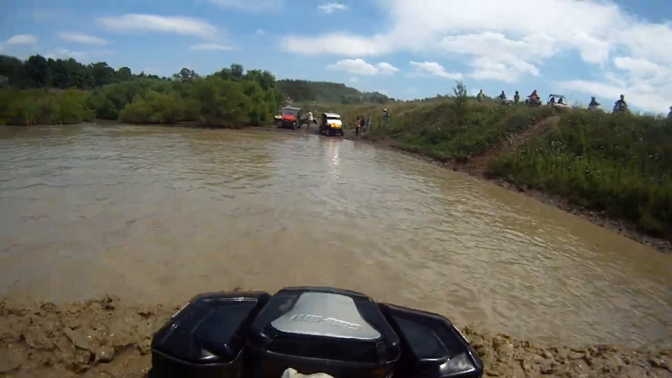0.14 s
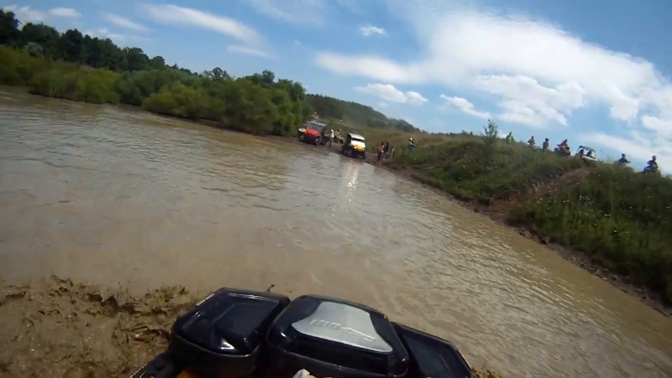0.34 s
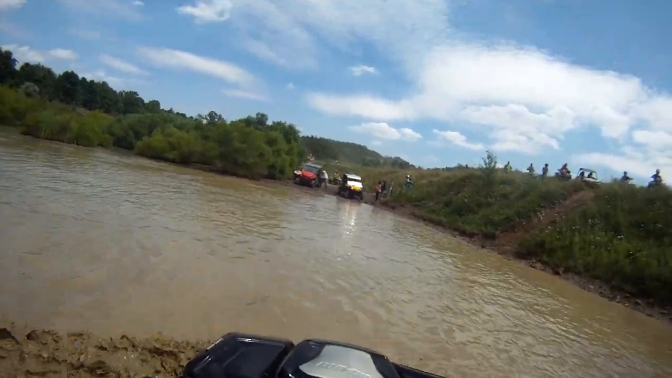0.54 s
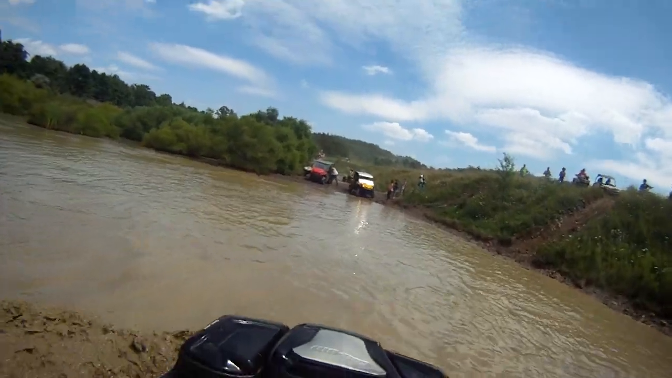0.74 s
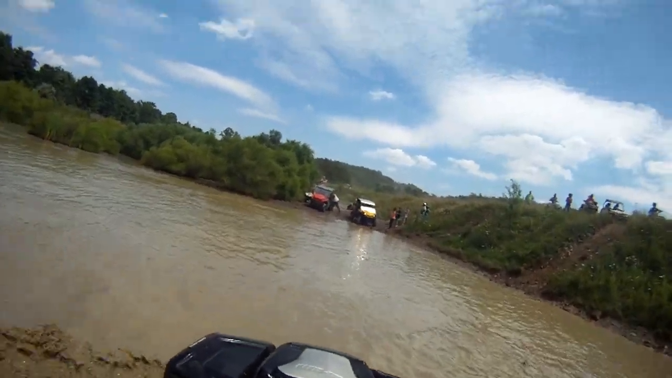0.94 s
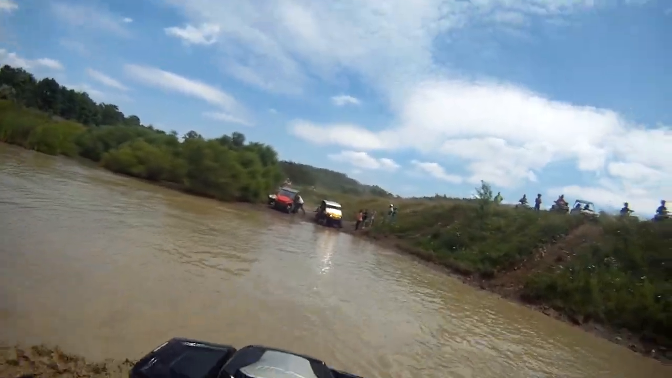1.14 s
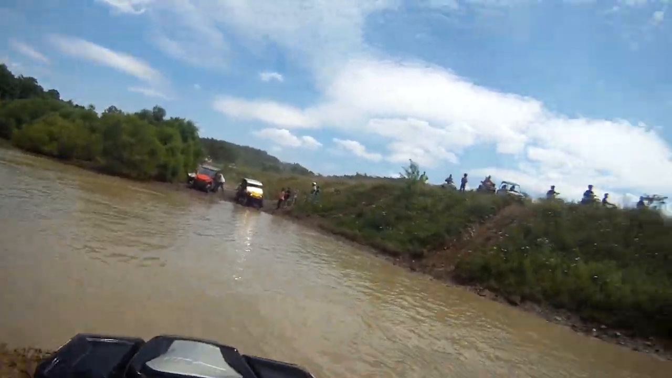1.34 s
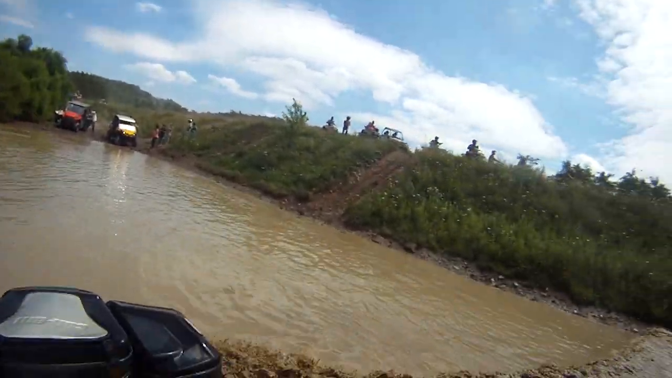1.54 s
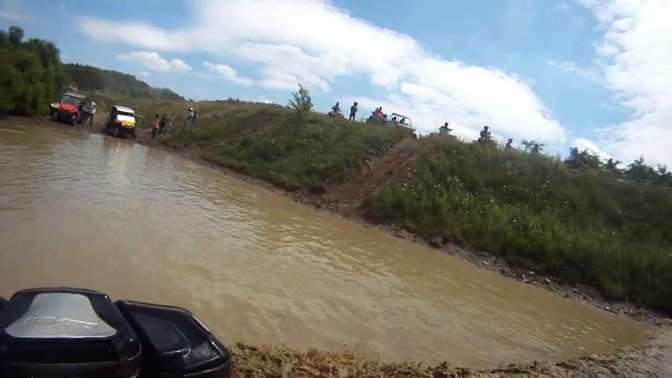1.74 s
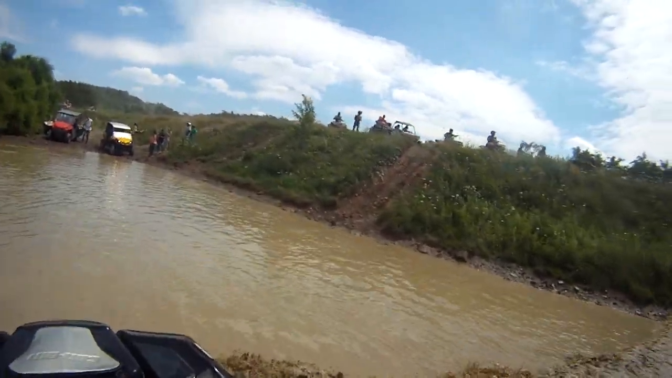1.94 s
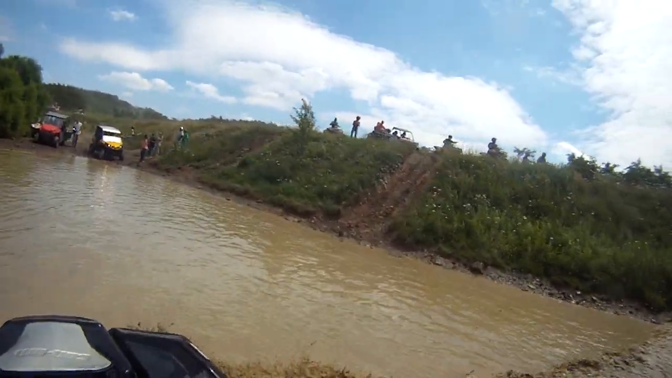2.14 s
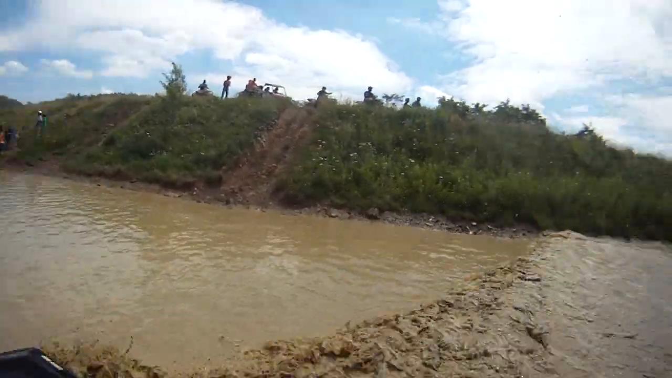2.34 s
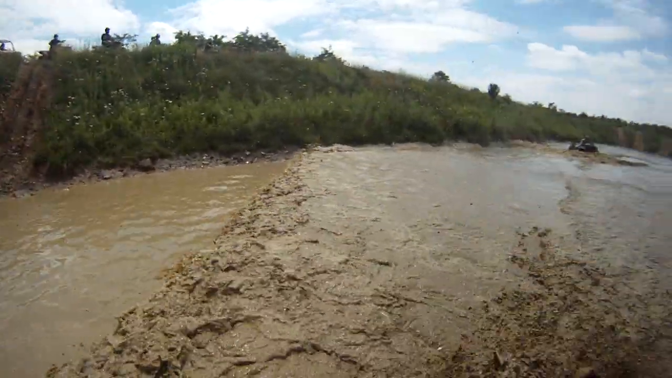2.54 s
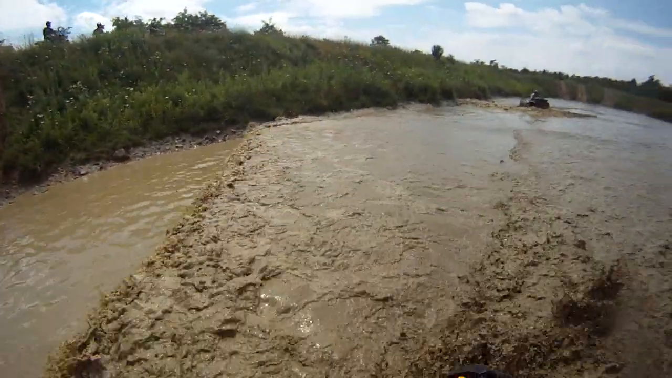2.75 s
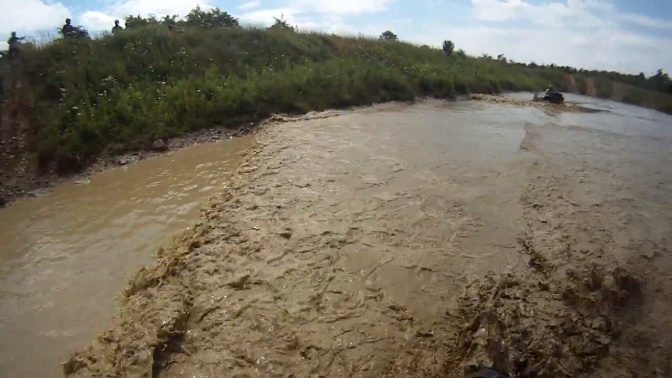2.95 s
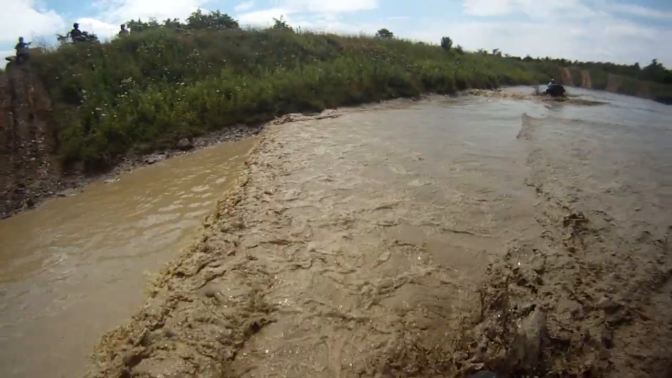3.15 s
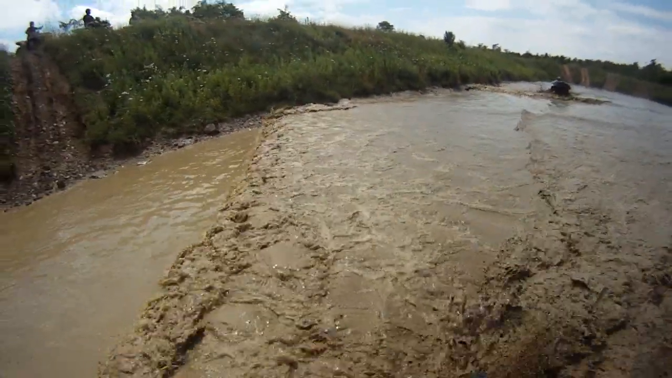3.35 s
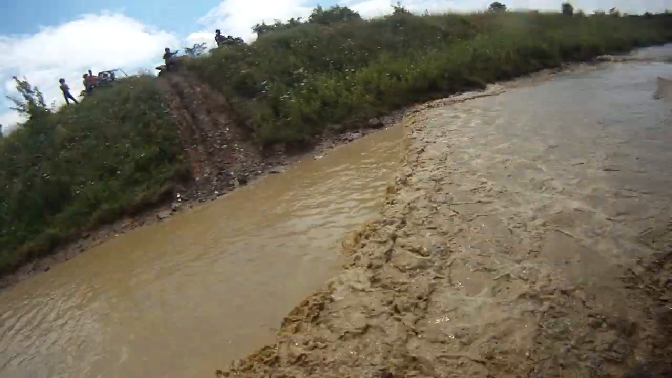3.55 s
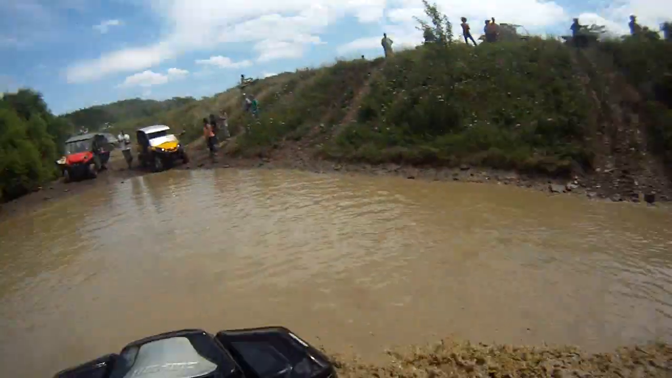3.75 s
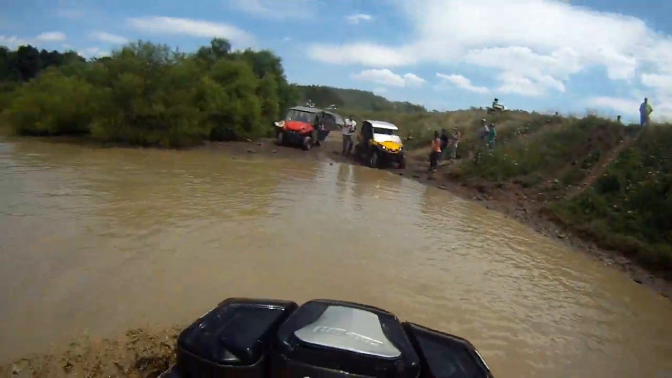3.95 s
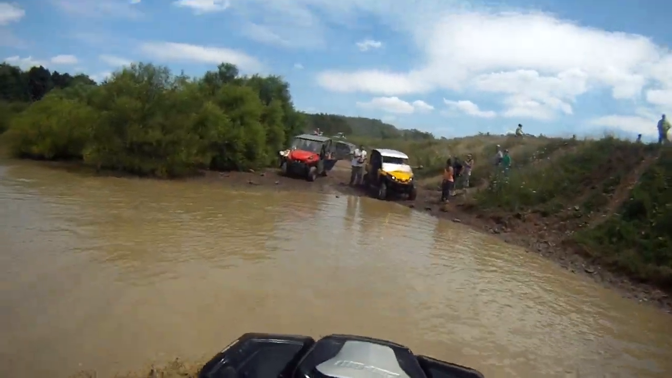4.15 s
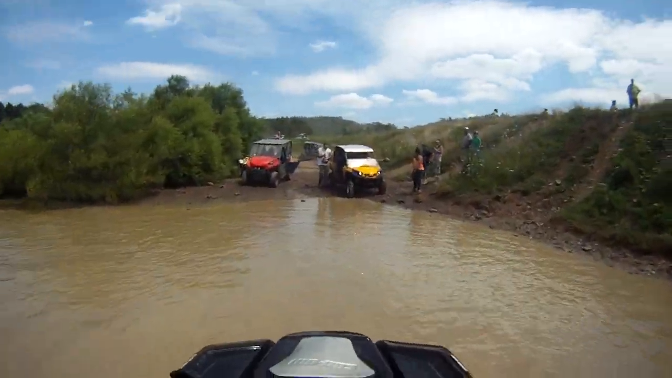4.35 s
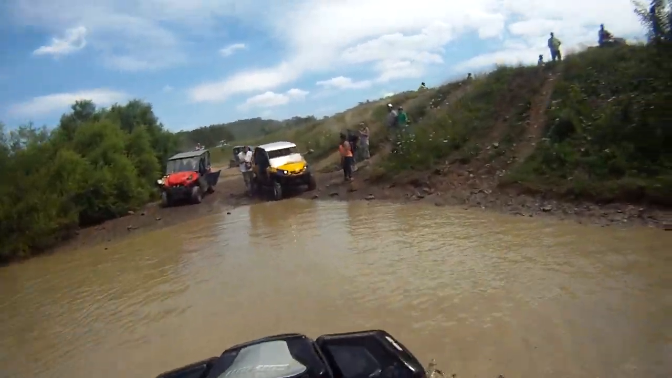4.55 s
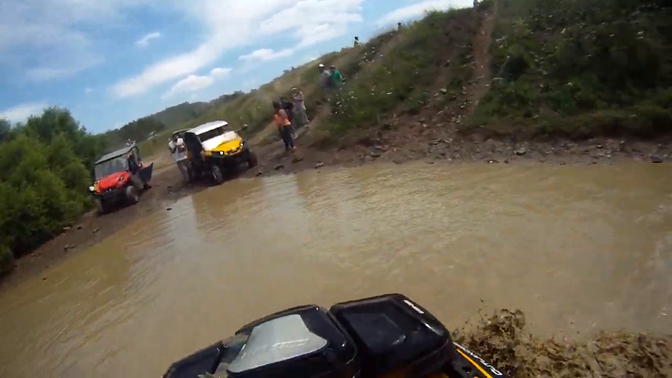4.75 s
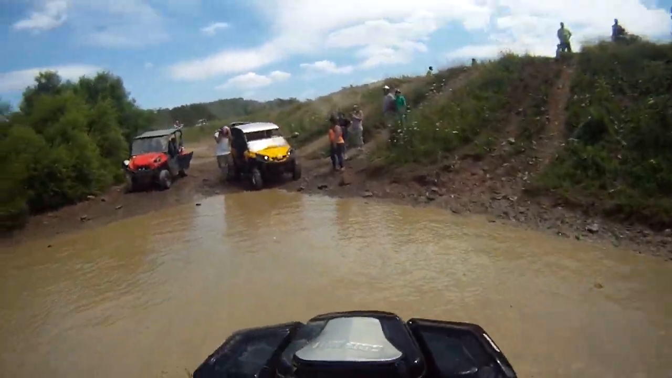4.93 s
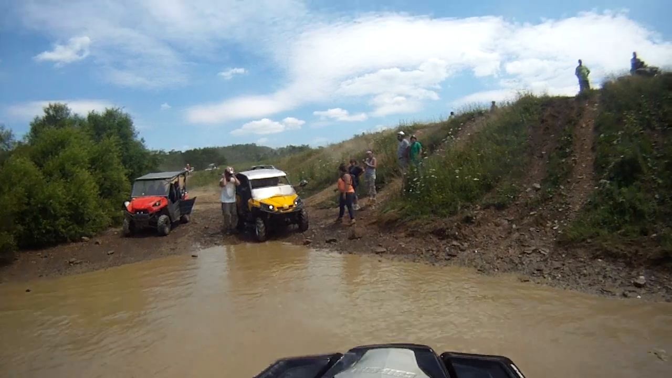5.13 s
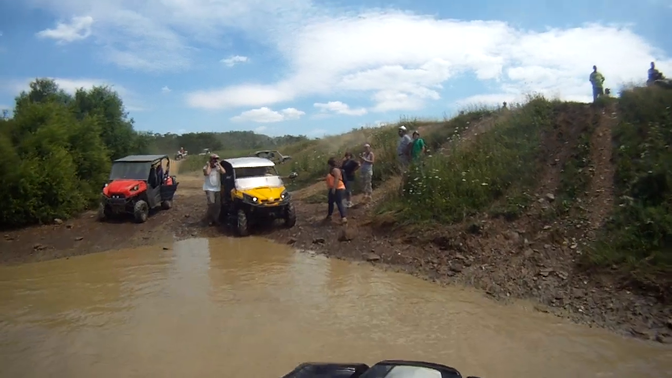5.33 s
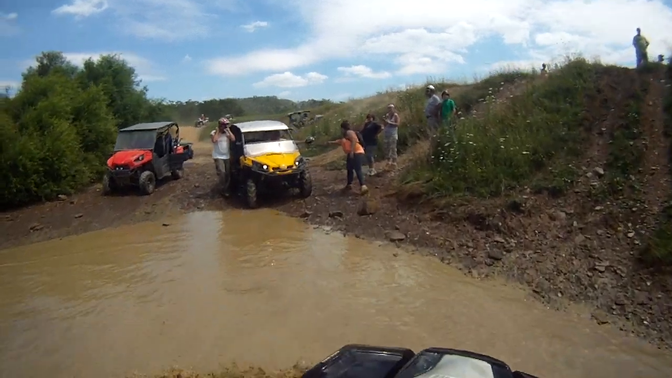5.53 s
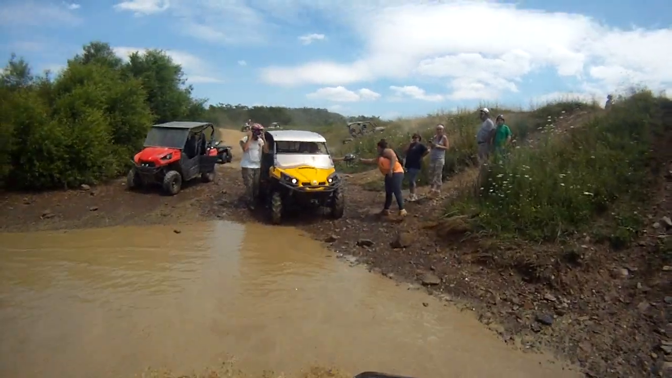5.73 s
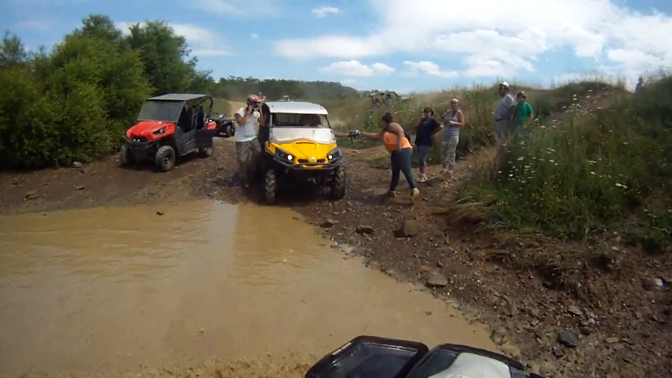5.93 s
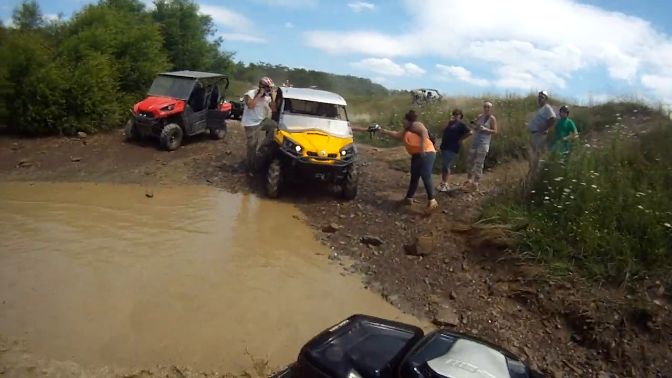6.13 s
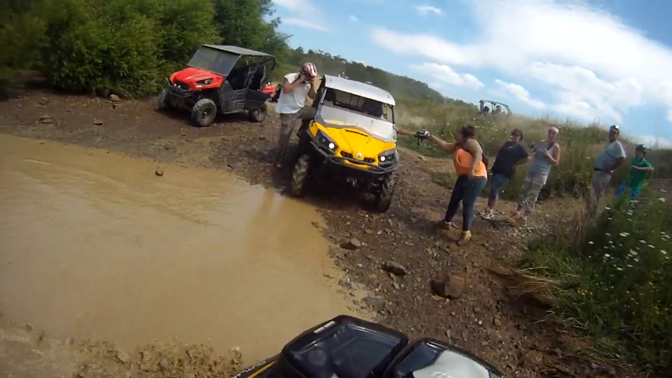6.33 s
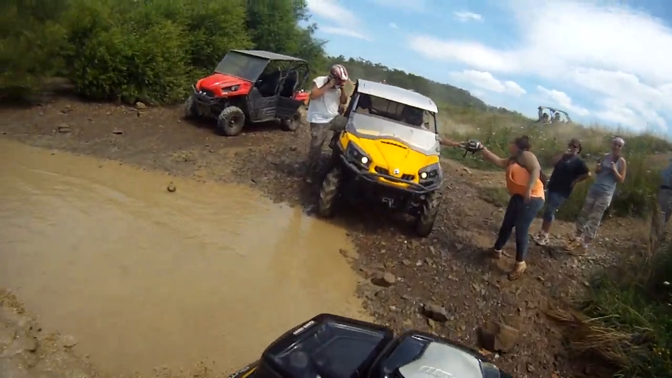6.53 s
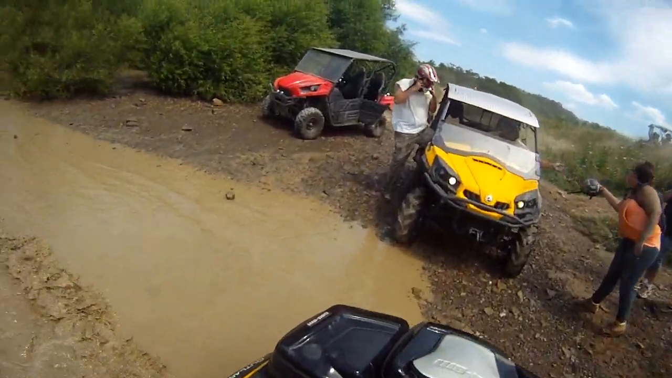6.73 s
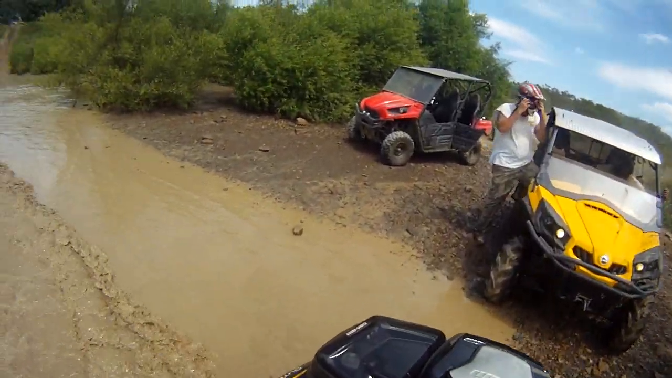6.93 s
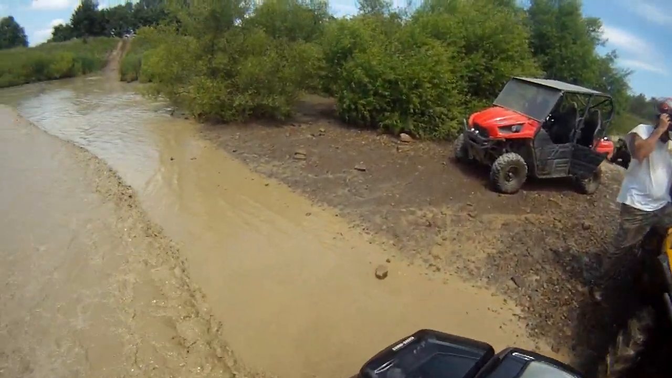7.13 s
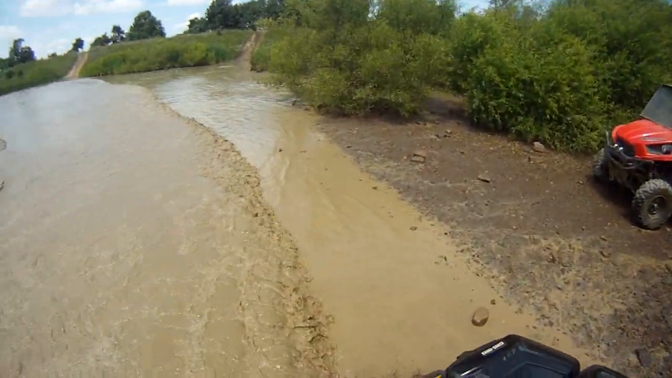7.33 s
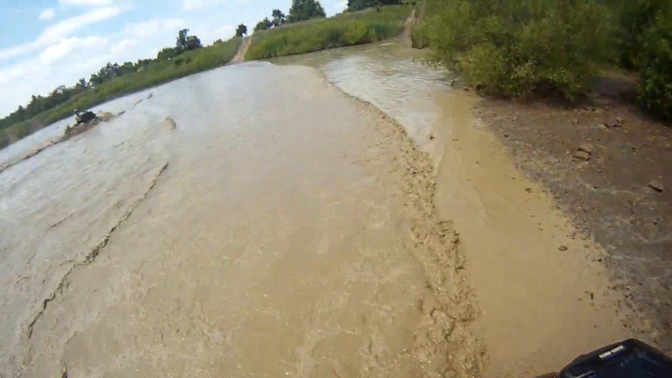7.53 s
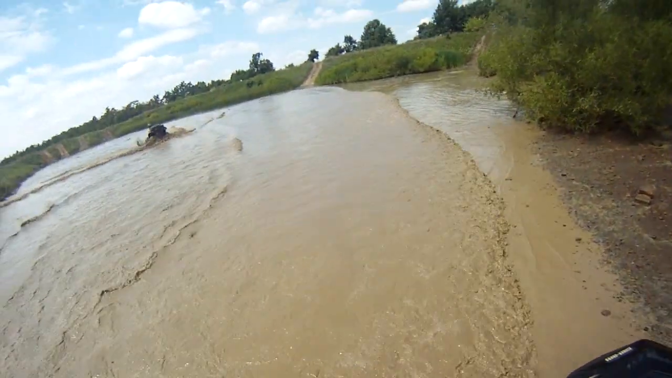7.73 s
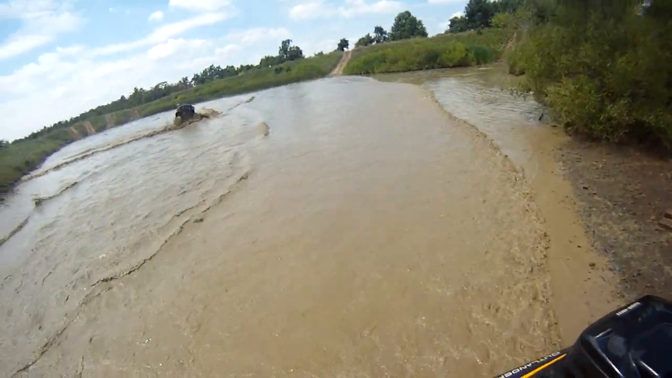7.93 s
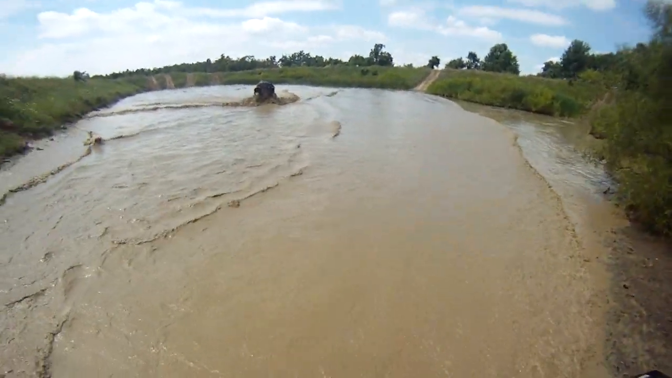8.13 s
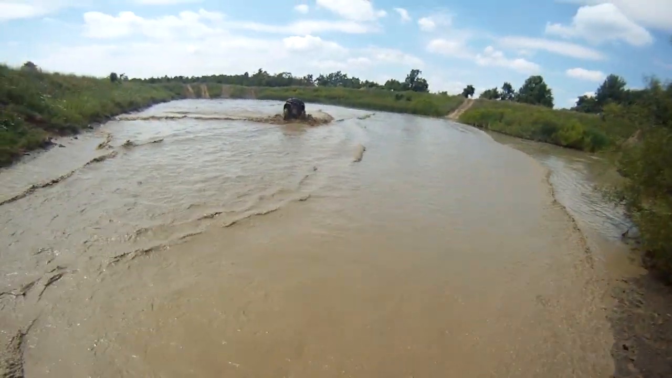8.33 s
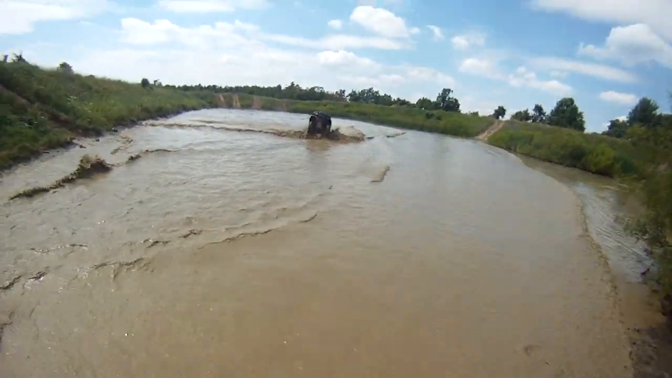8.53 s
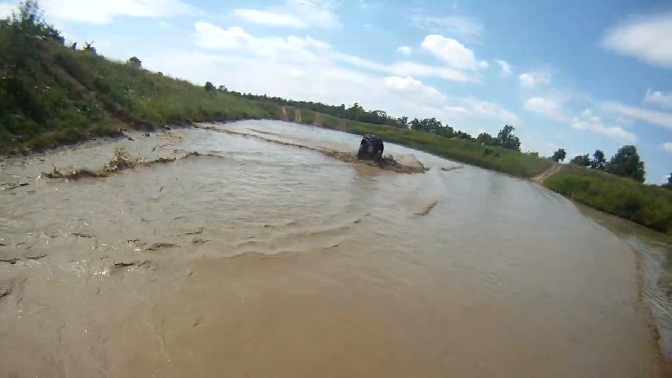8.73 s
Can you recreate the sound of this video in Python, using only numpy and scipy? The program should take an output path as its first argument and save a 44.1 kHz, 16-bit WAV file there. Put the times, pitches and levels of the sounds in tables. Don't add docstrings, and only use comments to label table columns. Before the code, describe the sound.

Gritty, lo-fi onboard sound of an all-terrain vehicle booming through deep muddy water, slowing near the bank with brief throttle blips.

```python
import sys
import numpy as np
from scipy import signal
from scipy.fft import rfft, irfft
from scipy.io import wavfile
from scipy.ndimage import uniform_filter1d, map_coordinates

SR = 44100
rng = np.random.default_rng(int(sys.argv[2]) if len(sys.argv) > 2 else 0)


def generate_wav(signal):
    frames = np.transpose(np.atleast_2d(signal))
    scaled = np.clip(frames, -1, 1) * 32767
    pcm = np.round(scaled).astype(np.int16)
    wavfile.write(sys.argv[1], SR, pcm)


def ratio(d):
    e = np.asarray(d, float) / 20
    return 10 ** e


N = 387189
SECOND_FIRING = .4

# [t/s, f/Hz]
SPEED = [(0, 45.3), (.6, 45.8), (1.7, 47.2), (3.4, 47), (4.6, 46.3), (5.01, 44.8), (5.26, 41.6),
         (5.62, 28.3), (6.21, 27.9), (6.5, 29.3), (7.14, 25.5), (7.43, 19.5), (7.6, 18.4), (7.85, 23.6),
         (8.17, 24.9), (8.44, 27.5), (8.56, 27.5), (8.78, 20.9)]
# [t/s, change of the cycle f/Hz, half length/s]
SPEED_CHANGES = [(0.57, 1.2, 0.11), (0.69, -0.4, 0.03), (0.91, 2.1, 0.09), (1.08, -2.7, 0.22), (1.95, 2.8, 0.12),
                 (2.31, -1.6, 0.35), (3.65, 2.8, 0.1), (3.97, -2.4, 0.08), (4.2, -0.6, 0.17), (4.34, 1.8, 0.06),
                 (4.73, -0.8, 0.16),
                 (5.47, -1, .1),
    (5.85, .6, .2),
    (6.78, -.4, .15),
    (7.7, -.6, .06),
    (8.29, .6, .08),
]


def crank():
    speed_changes = [(s, half_s, change) for s, change, half_s in SPEED_CHANGES]
    hz = curves(SPEED)[0] + bells(speed_changes)
    uneven = 1 + .002 * wobble(20)
    turn = 2 * np.pi * np.cumsum(hz * uneven) / SR
    load = np.clip((hz - 30) / 12, 0, 1)
    return turn, load


# [multiple of the cycle, level/dB at full load, level/dB at light load, unsteadiness/dB]
STRONG_ORDERS = [(1, -43, -59, -0.5), (2, -31, -42, 0.15), (3, -34.5, -40.5, 0.55), (4, -51, -47.5, 2.5),
                 (5, -48.5, -39.5, 1.5), (6, -62, -65.5, -0.5)]


def strong_orders(turn, load):
    total = 0
    for k, full_db, light_db, unsteady_db in STRONG_ORDERS:
        law = (full_db, light_db, 1, 2, unsteady_db)
        level_db = follows(law, load, rate=12) + swell_db(round(k))
        total = total + ratio(level_db) * order(turn, round(k), load)
    return total


# [multiple of the cycle, level/dB at full load, level/dB at light load, level/dB when faced]
OTHERS = [(7, -12, -7, 2), (8, -2.5, 2, 1.5), (9, -.5, -9, .5), (10, -11, -13, 5), (11, -9.5, -4, -6),
          (12, -7, -3, -6), (13, -8.5, -4, -5), (14, -10.5, -9, -2), (15, -18, -15, 0), (16, -18, -15, 0)]
# [level/dB at full load, level/dB at light load, dB per dB effort, dB when faced, unsteadiness/dB]
WEAK_LAW = (-45, -54, 1.2, 2.5, 1.4)


def weak_orders(turn, load):
    closing_db = -6 * 4 * load * (1 - load)
    common_db = follows(WEAK_LAW, load, rate=8) + closing_db + swell_db(0)
    faced = facing()
    total = 0
    for k, full_db, light_db, faced_db in OTHERS:
        flutter_db = (1 + .2 * max(k - 9, 0)) * wobble(6)
        own_db = load * full_db + (1 - load) * light_db + faced * faced_db
        total = total + ratio(common_db + own_db + flutter_db) * order(turn, round(k), load)
    return total


# [multiple of the cycle, level/dB]
TAIL_PIPE = [(18, -54), (19, -44), (20, -50), (23, -46), (24, -45)]


def tail_pipe(turn, load):
    pipe = sum(ratio(db + 2.5 * wobble(6.03)) * order(turn, k, load) for k, db in TAIL_PIPE)
    return load * facing() * pipe


# [t/s, half length/s, multiple of the cycle (0 = all weak orders),
# level/dB]
SWELLS = [(.1, 0.35, 3, 4.5), (.1, 0.36, 5, 6.5), (.6, 0.32, 4, 11), (.87, 0.12, 5, 4.5),
          (1.068, .1, 6, 21), (1.3, 0.11, 5, 6.5), (1.65, 0.31, 5, 11), (1.552, .1, 4, 8),
          (2.1, .14, 4, 10), (3.1, 0.11, 5, 5), (3.633, .12, 5, 6), (3.648, 0.1, 6, 21),
          (3.75, 0.16, 3, -6), (3.65, .1, 2, -1), (4.3, 0.15, 5, 7.5), (4.2, .12, 4, 8),
          (4.35, 0.27, 3, -4), (4.347, 0.063, 6, 14), (5.1, .2, 6, 9), (5.2, 0.24, 3, 1.5),
          (5.14, .07, 5, 2.5), (5.38, 0.21, 5, -9), (5.45, 0.17, 4, 5), (7.3, 0.37, 6, 11),
          (7.72, 0.2, 6, 29), (8.1, 0.21, 6, 18), (7.998, 0.22, 5, 7.5), (8.1, 0.38, 3, -12),
          (8.616, .06, 3, 7), (8.65, 0.21, 5, -8.5),
          (8.13, 0.17, 2, -9), (7.9, .1, 2, -2), (8.45, .2, 2, -9), (8.5, .4, 4, -7), (2.86, 0.15, 0, 1.5),
         (1.08, 0.19, 0, -0.5), (7.5, .2, 0, 3.5), (5.35, 0.47, 0, -3), (6.4, .3, 0, 5), (7, .2, 0, 0.5),
         (7.1, 0.17, 5, 4.5), (5.37, 0.074, 3, 3)]


def swell_db(k):
    return bells([(s, half_s, db) for s, half_s, which, db in SWELLS if round(which) == k])


def order(turn, k, load):
    pair = np.angle(1 + 0.67 * np.exp(-2j * np.pi * k * SECOND_FIRING))
    drift = (1.3 * (1 - load) + .06 * k) * wobble(1.6)
    return np.sqrt(2) * np.cos((k * turn + pair + drift).astype(np.float32))


# [f/Hz, level/dB]
ROAR = [(700, -38), (800, -20.5), (880, -15), (990, -8), (1100, 1.5), (1250, 3.5), (1330, 3), (1410, -15),
        (1500, -4), (1680, -6.5), (1780, -33), (2000, -47)]
# [f/Hz, level/dB]
ROAR_BEHIND = [(700, -31), (800, -11), (880, -4), (990, -6), (1100, 5.5), (1180, 2), (1280, -1), (1380, -8),
               (1500, -7.5), (1680, -3), (1780, -16), (2000, -20)]
# [level/dB at full load, level/dB at light load, dB per dB effort, dB when faced, unsteadiness/dB]
ROAR_LAW = (-33.5, -41, .5, -1.1, 0.63)
# [t/s, peak level/dB]
KNOCKS = [
    (0.279, -19),
    (0.625, -21),
    (0.842, -16.5),
    (1.614, -29),
    (2.3497, -15),
]


def intake(turn, load):
    cycle_starts = np.diff(np.floor(turn / (2 * np.pi)), prepend=0)
    snaps = cycle_starts * ratio(1.5 * rng.standard_normal(N))
    gulped = unit(patchy(0.76) * firings(turn, depth_db=0.0, sharp=4.5))
    air = gulped + ratio(-7.5) * unit(snaps)
    behind = facing()
    roar = unit((1 - behind) * unit(coloured(air, ROAR)) + behind * unit(coloured(air, ROAR_BEHIND)))
    blows = np.zeros(N)
    for s, db in KNOCKS:
        blows[round(s * SR)] = ratio(db - 3)
    ring = coloured(np.eye(1, N)[0], ROAR)
    knocks = coloured(blows, ROAR) / abs(ring).max()
    return ratio(follows(ROAR_LAW, load, rate=16) + gulps_db()) * roar + knocks


# [t/s, half length/s, level/dB]
GULPS = [(.45, .05, 0.5), (1.15, 0.098, 1.5), (1.85, 0.1, 1), (2.22, .07, 2.5), (2.42, .03, 3),
         (2.54, .04, 3.5), (3.58, .13, 2.5), (7.95, 0.067, 2)]


def gulps_db():
    return bells(GULPS)


def firings(turn, depth_db, sharp):
    def puff(lag):
        return np.exp(sharp * (np.cos(turn - 2 * np.pi * lag) - 1))
    return ratio(depth_db * (puff(.03) + 0.81 * puff(0.024 + SECOND_FIRING)))


def engine(turn, load):
    return strong_orders(turn, load) + weak_orders(turn, load) + tail_pipe(turn, load) + intake(turn, load)


# [t/s, level/dB]
FLOW = [(0, -1), (1, 0.1), (2.2, -0.1), (2.64, 1), (3.67, 2), (3.8, -0.2), (5.1, 0.1), (5.33, -1),
        (6.1, -4), (7.1, -5.5), (7.4, -7.5), (8.0, -6), (8.78, -7.5)]
# [f/Hz, level/dB]
WASH = [(4, 8), (20, 2), (40, 12.5), (110, 15), (160, 10), (250, 6), (430, 3), (620, 0.5), (780, -4),
        (900, 2), (1100, -35)]
# [f/Hz, level/dB]
CHURN = [(1300, -15), (1550, -7), (1760, -7.5), (1900, -3), (2060, 0.5), (2170, -1), (2290, 1), (2470, -2),
         (2640, -12), (2850, -10), (3000, -12.5), (3080, -26), (3200, -40)]
# [level/dB at full load, level/dB at light load, dB per dB effort, dB when faced, unsteadiness/dB]
CHURN_LAW = (-35, -38.5, 0.55, -1.2, 0.2)
# [f/Hz, level/dB]
SPRAY = [(2900, -29), (3080, -3.5), (3250, -2), (3500, -1), (3900, -5.5), (4300, -14), (4700, -8),
         (5150, -5), (5500, -9.5), (5800, -9.5), (6000, -14)]


def water(turn, load):
    flow_db, = curves(FLOW)
    wash_db = -43.5 + 0.47 * flow_db + 4.5 * load + 2.2 * facing() + 0.81 * wobble(14)
    wash = ratio(wash_db) * rush(WASH, patchy_db=1.5)

    churn_db = follows(CHURN_LAW, load, rate=12) + 0.44 * gulps_db()
    churn_gate = firings(turn, depth_db=1.5, sharp=1.7)
    churn = ratio(churn_db) * rush(CHURN, patchy_db=0.98, gate=churn_gate)

    spatter = ratio(0.75 * rng.standard_normal(N // 60 + 1)).repeat(60)[:N]
    spray_gate = spatter * firings(turn, depth_db=1.0, sharp=2.6)
    spray_db = -45 + flow_db + 0.22 * wobble(10)
    spray = ratio(spray_db) * rush(SPRAY, patchy_db=0.63, gate=spray_gate)
    return wash + churn + spray + drops()


# [t/s, peak level/dB, f/Hz]
DROPS = [(.9393, -35, 4600), (2.6305, -29, 5600), (3.4406, -36, 4800), (3.4855, -36, 4200),
         (3.5952, -33, 3700), (3.6025, -25, 5100), (3.0679, -32, 5000), (4.3, -34, 5000),
         (3.6145, -32, 3600), (4.1919, -36, 4500)]


def drops():
    ticks, t = np.zeros(N + 300), np.arange(300) / SR
    rise_s = .0006
    for s, db, hz in DROPS:
        envelope = t / rise_s * np.exp(-t / rise_s)
        ticks[round(s * SR):][:300] += ratio(db + 5.5) * envelope * np.sin(2 * np.pi * hz * t)
    return ticks[:N]


# [t/s, f/Hz, level/dB]
FAR = [
    [(7.2, 445, -80), (7.4, 460, -60), (7.7, 485, -60), (7.85, 490, -80)],
    [(7.85, 290, -75), (8.05, 305, -49), (8.3, 310, -49), (8.5, 303, -51), (8.6, 300, -75)],
    [(6.9, 250, -72), (7.1, 248, -56), (7.9, 245, -56), (8.1, 248, -48), (8.22, 252, -41), (8.35, 246, -50),
     (8.55, 245, -56), (8.7, 245, -70)],
]


def far_machines():
    total = 0
    for rows in FAR:
        hz, db = curves(rows)
        total = total + ratio(db + 2.7 * wobble(3.6)) * np.sin(2 * np.pi * np.cumsum(hz) / SR)
    return total


# [t/s, share 0-1]
HELMET = [(0, 0), (1.4, 0), (1.55, 0.21), (2.1, 0.24), (2.4, 0.16), (2.58, 0.84), (3.2, 0.72), (3.42, 0.9),
          (3.65, 0.97), (3.9, 0.098), (4.6, 0.27), (5.15, 0.21), (5.3, 0), (8.78, 0.74)]


def facing():
    return np.clip(curves(HELMET)[0], 0, 1)


# [t/s, level/dB]
THROTTLE = [(0, -1.8), (1.25, 0.5), (1.6, 0.5), (2.0, -0.5), (2.2, -1), (2.6, 0), (3.5, 0.5), (3.8, 0),
            (4.5, -0.2), (4.8, -3.5), (5.15, 0), (5.33, -2.5), (5.65, 0.5), (7.0, -4), (7.55, -7),
            (7.95, -1), (8.5, 1.3), (8.78, -5.5)]


def follows(law, load, rate):
    full_db, light_db, grows, faced_db, unsteady_db = law
    loaded_db = load * full_db + (1 - load) * light_db
    effort_db = grows * curves(THROTTLE)[0]
    return loaded_db + effort_db + faced_db * facing() + unsteady_db * wobble(rate)


def rush(spectrum, patchy_db, gate=1):
    return unit(coloured(patchy(patchy_db) * gate, spectrum))


def patchy(patchy_db):
    z = signal.stft(rng.standard_normal(N + 512), nperseg=512)[2]
    field = uniform_filter1d(rng.standard_normal(z.shape), size=4, axis=0)
    field = uniform_filter1d(field, size=10, axis=1)
    return signal.istft(z * ratio(patchy_db * unit(field)), nperseg=512)[1][:N]


def coloured(x, spectrum):
    size = 2 ** 14
    hz, db = np.transpose(spectrum)
    bins = np.log(np.fft.rfftfreq(size, 1 / SR) + 1)
    gain = ratio(np.interp(bins, np.log(hz), db, -70, -70))
    cepstrum = irfft(np.log(gain))
    cepstrum[1:size // 2] *= 2
    cepstrum[size // 2 + 1:] = 0
    response = irfft(np.exp(rfft(cepstrum)), size)
    return signal.fftconvolve(x, response)[:N]


def unit(x):
    return x / np.sqrt(np.mean(x ** 2) + 1e-20)


def curves(rows):
    s, *cols = np.transpose(rows)
    return [np.interp(np.arange(N) / SR, s, c) for c in cols]


def wobble(rate):
    coarse = np.arange(0, N + 128, 128)
    knots = rng.standard_normal(int(N * 40 / SR) + 4)
    smooth = map_coordinates(knots, [coarse * min(rate, 40) / SR])
    return np.interp(np.arange(N), coarse, smooth)


def bells(rows):
    t = np.arange(0, N + 256, 256) / SR
    total = 0 * t
    for s, half_s, high in rows:
        total = total + high * np.exp(-((t - s) / half_s) ** 2)
    return np.interp(np.arange(N) / SR, t, total)


def scene():
    turn, load = crank()
    return (engine(turn, load) + water(turn, load) + far_machines())[None]


def low_pass(x):
    return signal.sosfilt(signal.butter(12, 15640, fs=SR, output="sos"), x)


def record(dry):
    slow = signal.resample_poly(dry, 40, 147, axis=1, window=("kaiser", 3.0))
    held = signal.resample_poly(slow.repeat(4, axis=1), 147, 160, axis=1)
    length = held.shape[1]
    kept = np.fft.rfftfreq(length, 1 / SR) < 15300
    mix = irfft(rfft(held) * kept, length)[:, :N]
    return low_pass(mix)


dry = scene()
out = record(dry)
generate_wav(out)
```